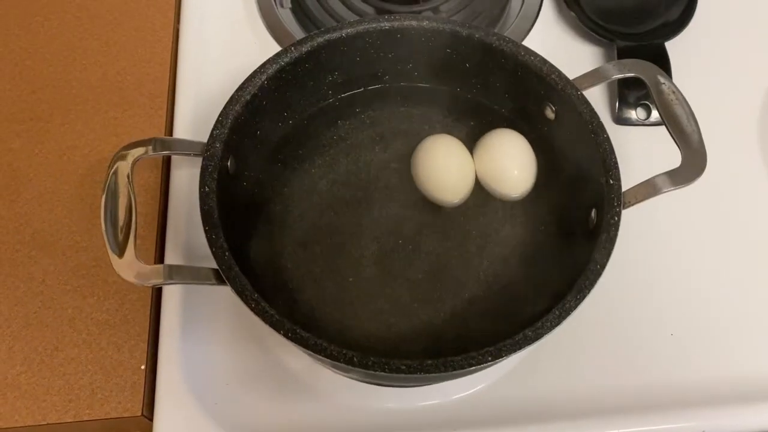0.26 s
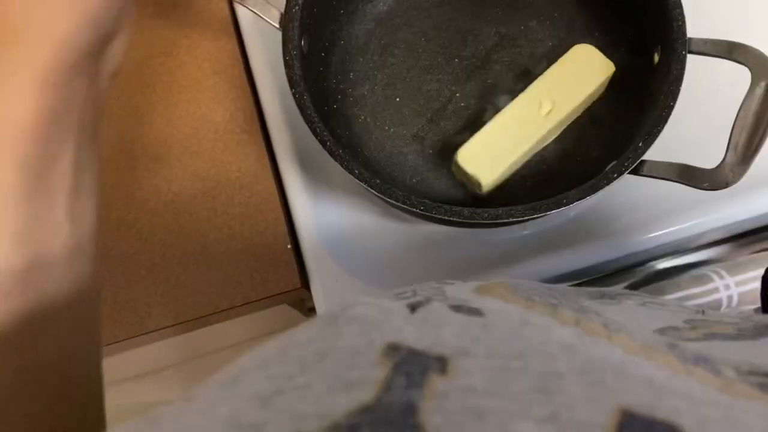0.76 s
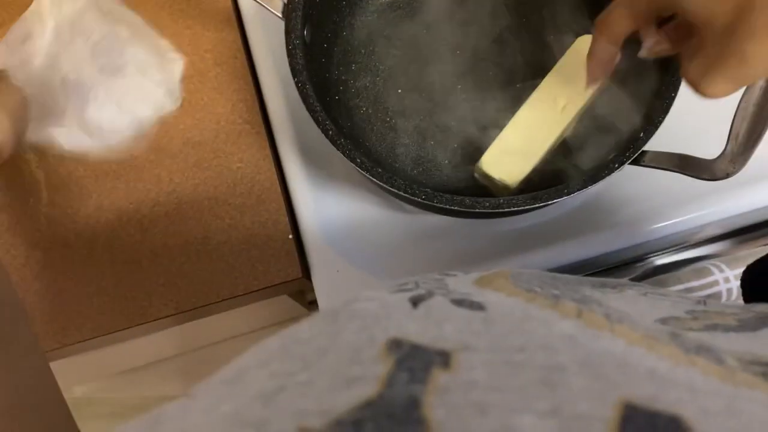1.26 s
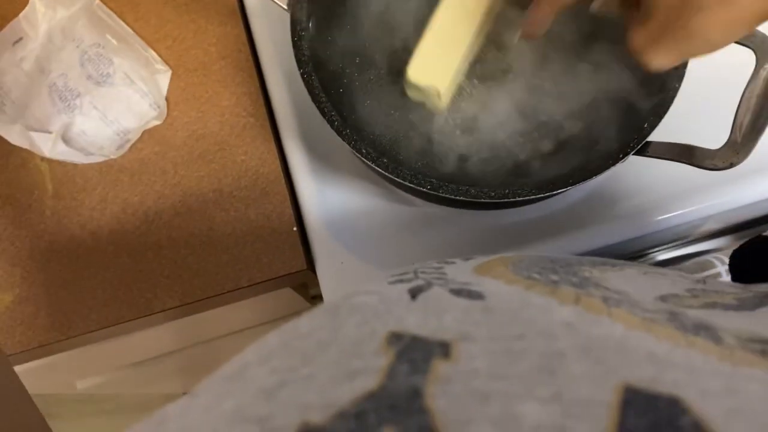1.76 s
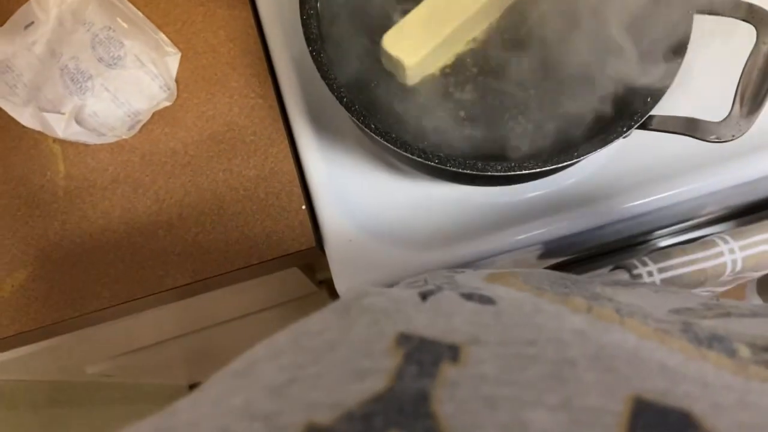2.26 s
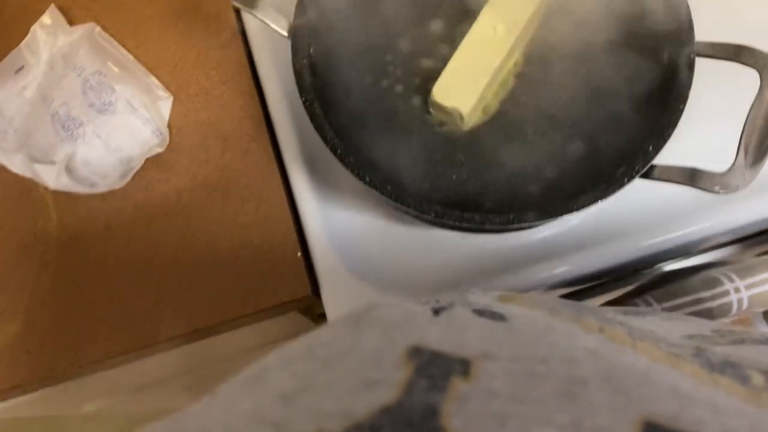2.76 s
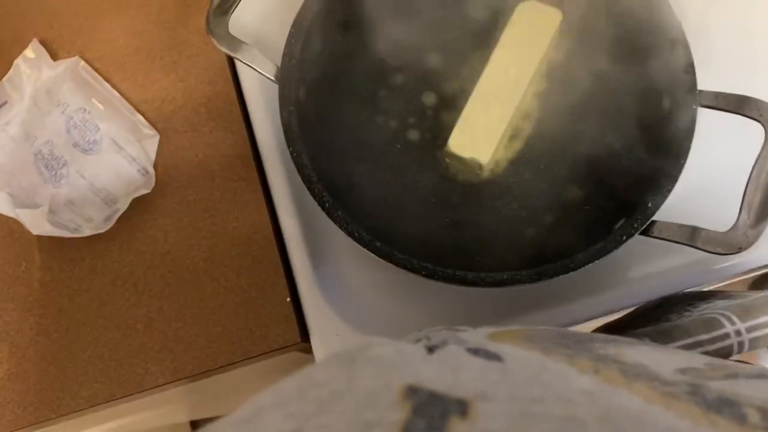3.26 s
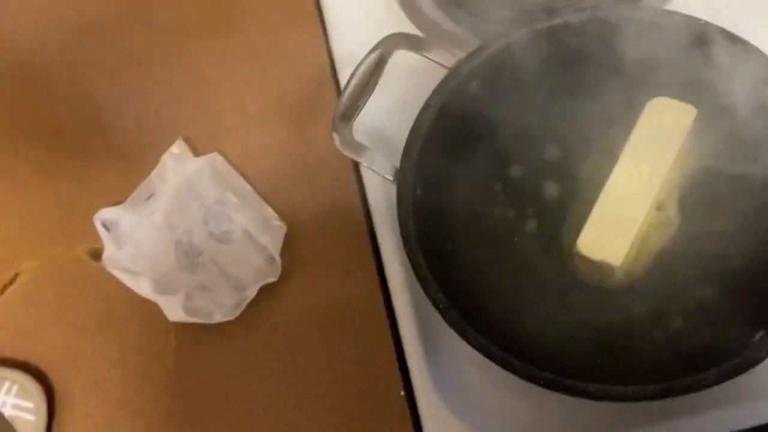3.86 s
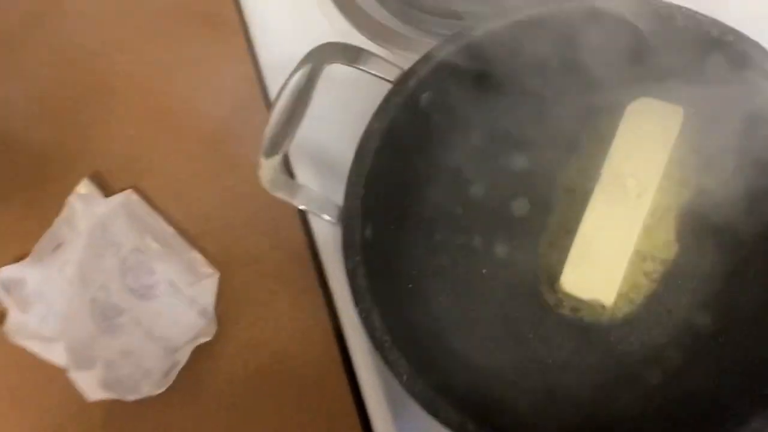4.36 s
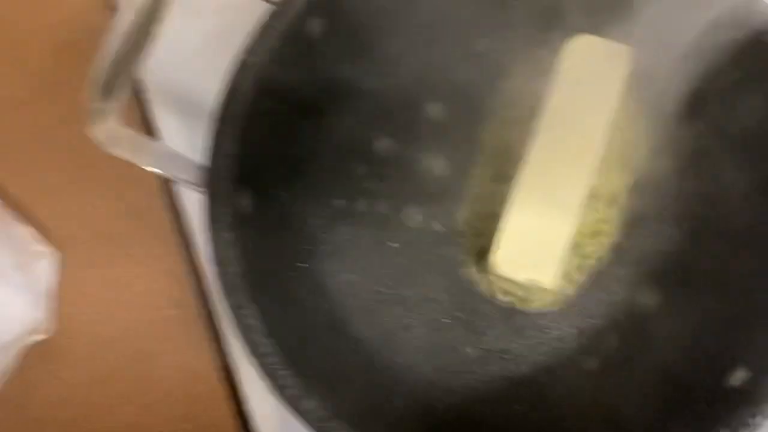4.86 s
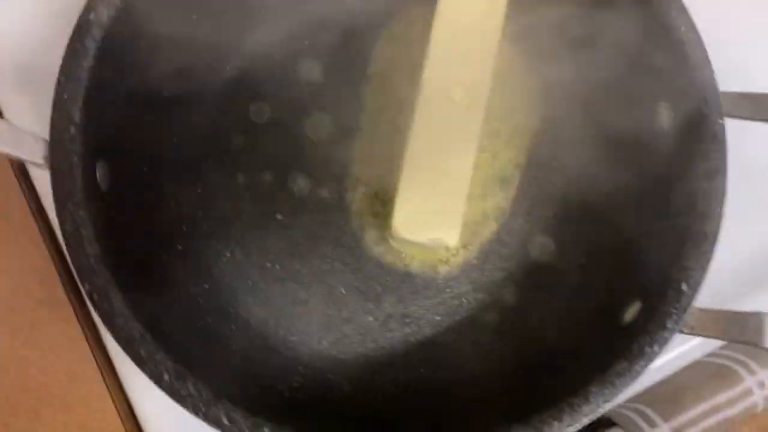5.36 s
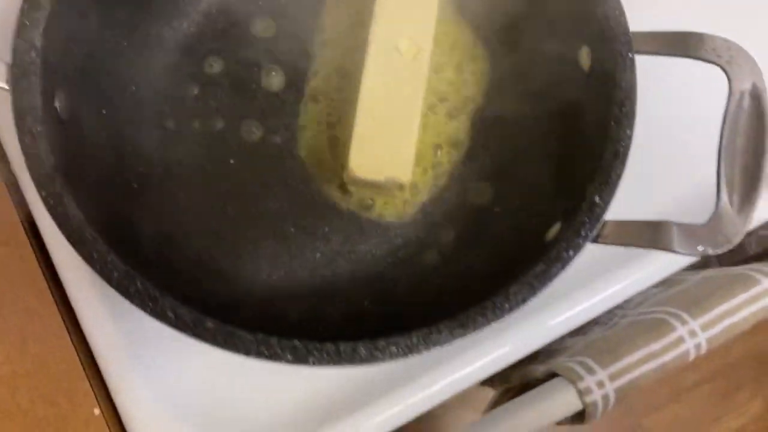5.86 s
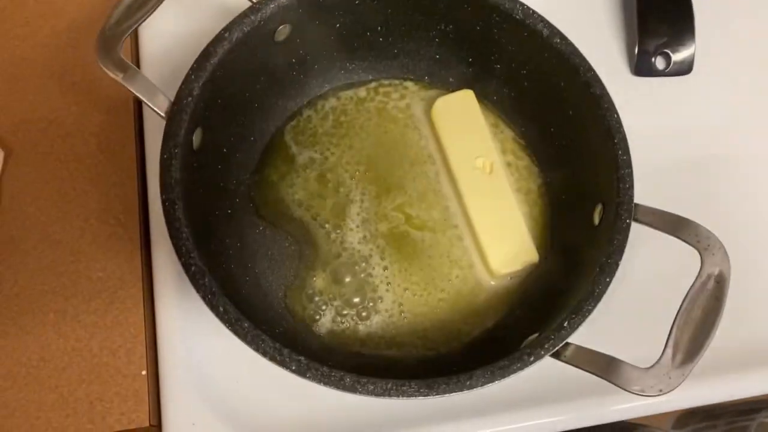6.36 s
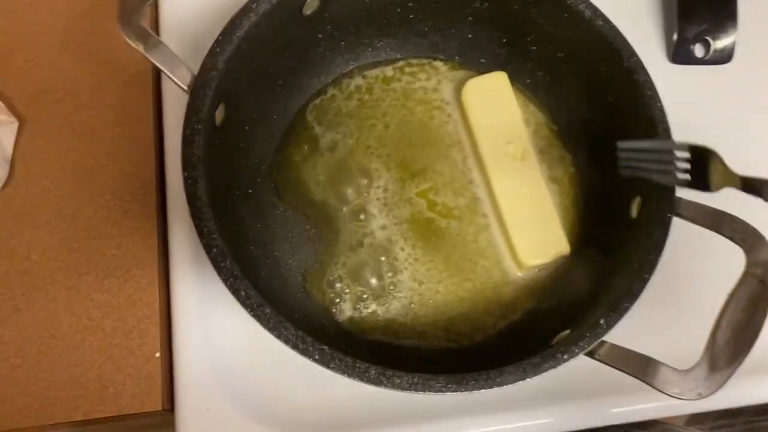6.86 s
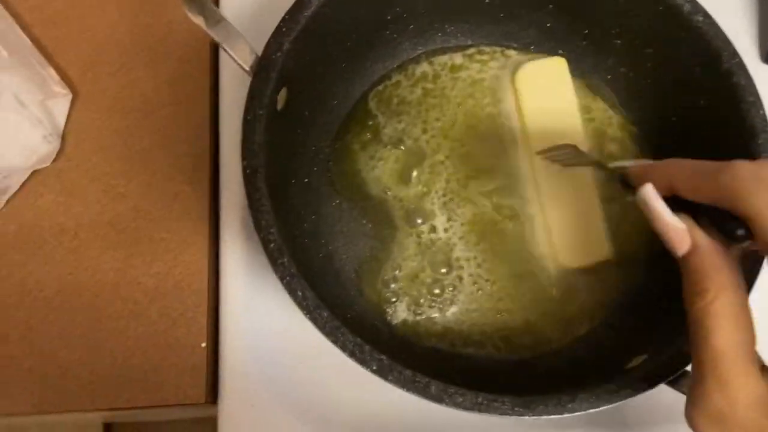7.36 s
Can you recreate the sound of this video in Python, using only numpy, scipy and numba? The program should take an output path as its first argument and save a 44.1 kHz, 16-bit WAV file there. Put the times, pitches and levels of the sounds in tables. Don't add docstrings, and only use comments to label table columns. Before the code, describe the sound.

Under a humming kitchen extractor, a quiet simmer cuts abruptly to loud searing butter, then to gentler bubbling with small spitting clicks.

```python
import sys
import numpy as np
from scipy import signal
from scipy.fft import rfft, irfft, next_fast_len
from scipy.io import wavfile
from scipy.ndimage import uniform_filter1d
from numba import njit

SR = 44100
rng = np.random.default_rng(int(sys.argv[2]) if len(sys.argv) > 2 else 0)


def master_out(mix):
    frames = np.transpose(np.atleast_2d(mix))
    ceiling = np.clip(frames, -1, 1)
    pcm = np.round(ceiling * 32767).astype(np.int16)
    wavfile.write(sys.argv[1], SR, pcm)


def convert_level_to_amplitude(level_db):
    exponent = np.asarray(level_db, float) / 20
    return 10 ** exponent


N = 335160


def curves(rows, t):
    s, *columns = np.transpose(rows)
    return [np.interp(t, s, column) for column in columns]


def colour(points, hz, column=1):
    points = np.array(points, float)
    octave = np.log2(np.maximum(hz, 1))
    point_octave = np.log2(points[:, 0])
    below = np.maximum(point_octave[0] - octave, 0)
    above = np.maximum(octave - point_octave[-1], 0)
    return np.interp(octave, point_octave, points[:, column]) - 18 * (below + above)


def unit(x):
    return x / np.sqrt(np.mean(x ** 2))


def ring(x, hz, width):
    return signal.lfilter(*signal.iirpeak(hz, hz / width, SR), x)


def patches(shape, slow, wide):
    field = uniform_filter1d(rng.standard_normal(shape), int(wide), axis=0)
    field = uniform_filter1d(field, int(slow), axis=1)
    return unit(uniform_filter1d(field, int(slow), axis=1))


# frequency in Hz, level in dB.
SIMMER_COLOUR = [(1500, 0.0), (2000, -4), (2500, -12), (3000, -9), (3700, -11), (4500, -14.5), (5500, -11),
                 (7000, -7.5), (8500, -16), (10000, -21), (12000, -21), (14000, -26.0), (15600, -27.2)]
SEAR_COLOUR = [(1500, -18.5), (2000, -15.5), (2500, -10), (3000, -3), (3700, -2), (4500, -3.5), (5500, -1),
               (7000, -2.2), (8500, -2), (10000, 0.5), (12000, 1), (14000, -0.5), (15600, -1.5)]
FOAM_COLOUR = [(1500, -5.5), (2000, -18), (2500, 1), (3000, -2.5), (3700, -5), (4500, -5.5), (5500, -0.5),
               (7000, 2), (8500, -2), (10000, -9), (12000, -9), (14600, -20), (15600, -23)]
# time in seconds, level in dB per Hz,
# melted pool from 0 to 1, lead of the left port in radians as the phone turns.
SIMMER_MOVES = [(0, -88, .75, .7), (.73, -90, .75, .7)]
SEAR_MOVES = [(.74, -74.5, 0.16, 1.2), (.9, -71, 0, 0.73), (1.45, -70.5, 0.55, .9), (1.8, -69, 0.3, 0.17),
              (2.2, -68.5, 0.09, .3), (2.8, -66.5, .25, .5), (3.3, -65.5, 0.44, 0.65),
              (3.68, -69, 0.81, 1.8), (4.14, -68.5, 0.68, 1.24), (4.5, -66.5, 0.69, 1.75),
              (4.9, -63.5, 0.64, 1.8), (5.15, -66, 1, 1.05), (5.45, -66.5, 0.81, 0.78),
              (5.9, -68.5, 0.96, 1.25)]
FOAM_MOVES = [(5.92, -78.5, 0.73, .75), (6.45, -80, 0.91, 0.67), (6.85, -79, 0.95, .55),
              (7.35, -78.5, 1, 0.61), (7.47, -81, .9, .5), (7.6, -83, 0.51, .5)]
# bubbles per second, size spread in dB,
# steam share from 0 to 1, patchiness in dB, spurts in dB.
BURSTS = [
    (3000, 2, 0.83, 1.8, 0.2),
    (11950, 2.5, 0.76, 0.8, .5),
    (6200, 3.5, 0.5, 1.4, 0.96),
]
# frequency in Hz, share of the lead of the pan.
REACH = [(1800, 0.43), (2400, 1.2), (3500, 0.81), (5000, 0.065), (6700, 0.24), (8000, -0.022), (11000, 0),
         (12900, 0.028), (14500, -.25), (15100, -0.62)]


def sizzle(t, spectrum, moves, rate, spread_db, steam, patchy_db, spurt_db):
    jet = rng.standard_normal(len(t))
    draws = rng.random((int(rate * len(t) / SR), 3))
    when, pitch, big = draws.T
    start = (when * len(t)).astype(np.int64)
    hz = 2400 + 14500 * pitch
    size = np.sqrt(hz) * convert_level_to_amplitude(-spread_db * np.log(big + 0.0037))
    bubbles = grains(start, hz, size, 3.5, len(t))
    steam = np.clip(steam, 0, 1)
    boil = np.sqrt(steam) * jet + np.sqrt((1 - steam) * 0.69) * unit(bubbles)

    def db(hz, t):
        level, pool = curves(moves, t)[:2]
        spray = flares(t)
        pool_tilt_db, usual_pool = (11, 2, -4.5), 0.7
        flare_share = np.array((0.093, 0.1, 0.9))
        bands = np.outer(pool_tilt_db, pool - usual_pool) + np.outer(flare_share - 1, spray)
        centres = np.log([1700, 3500, 6200, 10500, 14300])
        tilt = np.array([np.interp(np.log(hz + 1), centres, band) for band in np.eye(5)[[1, 2, 4]]])
        flicker = patchy_db * patches((len(hz), len(t)), 6.5, 10)
        spurts = spurt_db * patches((1, len(t)), 5, 1)
        return colour(spectrum, hz)[:, None] + level + spray + tilt.T @ bands + flicker + spurts

    def lead(hz, t):
        return np.outer(np.interp(hz, *np.transpose(REACH)), curves(moves, t)[2])

    return ports(boil * np.sqrt(SR / 2), t[0], db, lead)


@njit
def grains(start, hz, size, cycles, length):
    out = np.zeros(length + 400)
    for k in range(len(hz)):
        step = np.exp((2j * np.pi - 3 / cycles) * hz[k] / SR)
        z = size[k] + 0j
        for i in range(min(int(2 * cycles * SR / hz[k]), 400)):
            out[start[k] + i] += z.imag
            z *= step
    return out[:length]


# peak time in seconds, lift in dB.
FLARES = [(1.63, 4.5), (2.0, 2.5), (2.25, 3), (2.63, 0), (3.89, 2.5), (4.27, 1.5), (4.68, 0), (5.29, 0.5),
          (6.05, 1), (6.31, 0.5), (7.0, 1.5)]


def flares(t):
    rise_s, fall_s = 0.09, 0.11
    return sum(db * np.exp(-((t - s) / np.where(t < s, rise_s, fall_s)) ** 2) for s, db in FLARES)


# frequency in Hz, lead of the left port in radians.
PORTS = [(5000, 0.2), (6850, 2.61), (7950, 3.61), (9600, 5.95), (11350, 7.04), (12900, 9.1), (14600, 10.33),
         (16000, 16.5)]
# frequency in Hz, wander in radians.
SCATTER = [(1500, 0.76), (2000, .15), (2600, 0.28), (4200, 0.97), (5200, 0.56), (6200, 0.4), (6850, 0.08),
           (7950, 0.053), (8800, 0.66), (9600, .04), (11350, .04), (12200, 0.64), (12900, .04),
           (14600, .04), (15200, 0.83)]


def ports(x, start, db=lambda hz, t: 0, lead=lambda hz, t: 0):
    hz, t, z = signal.stft(x, SR, nperseg=256)
    wander = np.interp(hz, *np.transpose(SCATTER))[:, None] * patches(z.shape, 2, 2)
    sway = 0.16 * patches(z.shape, 8, 6)
    own_lead = np.interp(hz, *np.transpose([(0, 0)] + PORTS))[:, None]
    turn = np.exp(.5j * (own_lead + lead(hz, t + start) + wander + sway))
    z = z * convert_level_to_amplitude(db(hz, t + start))
    return signal.istft(np.array([z * turn, z / turn]), SR, nperseg=256)[1][:, :len(x)]


# time in seconds, peak in dB, frequency in Hz.
SPITS = [(5.9843, -32, 5460), (6.0496, -37, 5200), (6.1662, -24, 5300), (6.2182, -32, 4730),
         (6.292, -26, 5710), (6.342, -26, 5630), (6.4307, -33, 5100), (6.515, -32, 3700),
         (6.6507, -34, 3080), (6.6906, -32, 5330), (6.738, -33, 5870), (6.8413, -36, 5700),
         (6.859, -25, 5690), (6.9111, -26, 4900), (6.961, -24.5, 5400), (7.0104, -26, 5120),
         (7.0578, -35, 5340), (7.0768, -30, 5470), (7.152, -24, 5160), (7.186, -26, 3040),
         (7.2429, -29, 5060), (7.3646, -28, 5180)]


def spits(t):
    out = np.zeros(len(t))
    for s, db, hz in SPITS:
        add_pop(out, s - t[0] - .0005, db - 2.5, 1.9 * hz, hz, .0009)
    return ports(out, t[0])


# time in seconds, peak in dB, start in Hz, end in Hz, length in seconds.
POPS = [(5.7567, -19.5, 3650, 605, 0.0063), (1.4, -35, 3100, 1940, 0.003), (1.267, -37, 2600, 2200, .006),
        (3.2, -34, 1050, 480, 0.0092), (4.8, -38, 630, 610, 0.014), (3.53, -38, 63, 70, .07),
        (1.2, -47, 60, 50, .09), (5.855, -36, 610, 540, 0.0063), (6.1, -38, 2500, 1700, 0.0055),
        (6.22, -38, 2500, 2350, 0.0042), (7.523, -38, 2400, 2250, 0.0043), (7.577, -38, 2700, 2600, 0.0031),
        (0.289, -47, 1300, 750, .004), (0.55, -42, 620, 520, 0.01)]
TAPS = [
    (1.2175, -30, 3600, 2300, .002),
    (1.2178, -29, 2200, 1300, .0024),
    (1.2605, -34, 3600, 1900, .002),
]


def knocks():
    out = np.zeros(N)
    for row in POPS + TAPS:
        add_pop(out, *row)
    return out


def add_pop(out, s, db, start_hz, end_hz, length):
    u = np.arange(int(length * SR)) / (length * SR)
    hz = end_hz + (start_hz - end_hz) * np.exp(-u / 0.085)
    swell = np.sin(np.pi * u ** 0.71) ** 0.2
    i = int(s * SR)
    out[i:i + len(u)] += convert_level_to_amplitude(db) * swell * np.sin(2 * np.pi * np.cumsum(hz) / SR)


# time in seconds, peak in dB.
TICKS = [(0.0233, -54.5), (0.1111, -58), (0.1645, -58), (0.2249, -53.5), (0.2844, -59), (0.3444, -55),
         (0.3965, -56), (0.4444, -67), (0.5013, -53.5), (0.5844, -64), (0.6544, -51)]
# frequency in Hz, width in Hz, level in dB.
POT = [(5700, 250, -1), (8150, 300, 3), (10600, 2500, -1.5), (13500, 3000, -6), (4300, 280, -0.5)]


def ticks(t):
    shake = sum(convert_level_to_amplitude(db) * (t > s) * np.exp(-((t - s) / 0.017) ** 2) for s, db in TICKS)
    buzz = sum(convert_level_to_amplitude(db) * unit(ring(rng.standard_normal(len(t)), hz, width)) for hz, width, db in POT)
    return ports(convert_level_to_amplitude(-8.5) * shake * buzz, t[0])


# time in seconds, level in dB.
DRUM = [(.73, -43), (1.4, -42), (1.7, -40), (2.6, -43), (3.55, -41), (3.9, -43.5), (4.7, -45), (5.4, -58),
        (5.9, -52)]
# frequency in Hz, width in Hz, level in dB.
PAN = [(433, 177, -1.5), (534, 117, -3), (618, 130, 1), (799, 102, -4.5), (1001, 260, 0.5), (1239, 97, 2),
       (1340, 600, -0.5)]


def drum(t):
    db, = curves(DRUM, t)
    dry_db, wet_db, pool_spreads_s, pool_takes_s = -3, -10, 3.8, 0.28
    wet = (1 + np.tanh((t - pool_spreads_s) / pool_takes_s)) / 2
    upper_db = dry_db + (wet_db - dry_db) * wet
    push = rng.standard_normal(len(t)) * convert_level_to_amplitude(1.3 * patches((1, len(t)), 910, 1)[0])
    modes = []
    for k, (hz, width, mode_db) in enumerate(PAN):
        tone = ring(ring(push, hz, width), hz, 1.23 * width)
        modes.append((-1) ** k * convert_level_to_amplitude(mode_db) * unit(tone))
    floor = sum(modes[:4]) + convert_level_to_amplitude(upper_db) * sum(modes[4:])
    return convert_level_to_amplitude(db - 5 + np.array([[-.7], [.7]])) * floor


# time in seconds, level in dB.
HUM = [
    [(.76, -32.2), (2.77, -32.9), (3.4, -32), (4.85, -30), (5.89, -31.5)],
    [(5.94, -33), (7.5, -31.5), (7.6, -31.5)],
]
# frequency in Hz, level in dB under the hum, start in radians.
MAINS = [(60, -25, .3), (180, -23, 0.52), (360, -24, 1.2)]


def hum(t, rows, hz, octave_db):
    db, = curves(rows, t)
    turn = 2 * np.pi * t
    buzz = np.sin(hz * turn) + convert_level_to_amplitude(octave_db) * np.cos(2 * hz * turn + 0.49)
    buzz = buzz + sum(convert_level_to_amplitude(d) * np.sin(f * turn + start) for f, d, start in MAINS)
    return np.sqrt(2) * convert_level_to_amplitude(db + np.array([[-.6], [.6]])) * buzz


# frequency in Hz, mid in dB per Hz, side in dB per Hz.
AIR_POT = [(30, -80, -110), (60, -81, -102), (90, -71, -99), (200, -74.5, -93), (332, -76.5, -87),
           (480, -75, -82), (596, -75.5, -70), (750, -82.5, -76), (900, -84, -75), (1120, -87, -82),
           (1330, -85, -88), (1600, -91.5, -94), (2000, -93, -96), (2530, -95, -91)]
AIR_PAN = [(30, -80, -96), (60.4, -76, -90), (91, -70, -86), (206, -69, -78), (330, -75, -83),
           (480, -74, -79), (600, -74.5, -76.5), (760, -76.5, -79.5), (904, -84.5, -77.5),
           (1140, -83.5, -83.5), (1360, -81, -85), (1580, -87, -92), (2020, -84.5, -98.5),
           (2400, -82.5, -85)]
# frequency in Hz, width in Hz, level in dB.
BLADES = [
    [(145.9, 1, 2), (292.4, 3.4, -2), (441.3, 4.4, -14), (524.5, 5, -13)],
    [(142.3, 2, -10.5), (287.6, 2.8, -5), (432, 4.2, -12), (156.2, 2.2, -1.5)],
]
# time in seconds, frequency in Hz, level in dB.
WHINE = [(0, 434, -63), (3.3, 429.6, -67), (3.7, 430.3, -55), (5.2, 433, -48), (5.8, 430, -47),
         (5.9, 436, -51), (5.95, 438.2, -52.5), (7.6, 440.5, -48.5)]


def hood(t, air, air_db, *wheel_db):
    n = next_fast_len(len(t), True)
    hz = np.fft.rfftfreq(n, 1 / SR)
    common, other = rfft(rng.standard_normal((2, n))) * np.sqrt(SR / 2)
    lean = np.clip(np.interp(hz, [100, 450, 900, 1400], [0.57, 0.49, 0.16, 0.32]), 0, 1)
    mid = common * convert_level_to_amplitude(colour(air, hz))
    loose = np.sqrt(1 - lean ** 2) * (.8j * common + .6 * other)
    side = (loose - lean * common) * convert_level_to_amplitude(colour(air, hz, column=2))
    rush = irfft(np.array([mid + side, mid - side]), n)[:, :len(t)]

    whine_hz, whine_db = curves(WHINE, t)
    tones = convert_level_to_amplitude(whine_db + 3) * np.sin(2 * np.pi * np.cumsum(whine_hz) / SR)
    for wheel, level_db in zip(BLADES, wheel_db):
        for f, width, db in wheel:
            skirt = unit(ring(rng.standard_normal(len(t)), f, width))
            tones = tones + convert_level_to_amplitude(level_db + db) * (np.sin(2 * np.pi * f * t) + 0.31 * skirt)
    return convert_level_to_amplitude(air_db) * rush + convert_level_to_amplitude(np.array([[-.8], [.8]])) * tones


# start in seconds, end in seconds, fade-in in seconds, hood air in dB,
# fast fan wheel in dB, slow fan wheel in dB.
SHOTS = [
    (0, .727, 0.00094, 0.5, -45.5, -65),
    (.727, 5.905, 0.021, -0.5, -44.5, -44),
    (5.905, 7.6, 0.025, 1, -45, -47.5),
]


def scene():
    def sear_extra(t):
        return hum(t, HUM[0], hz=120.0, octave_db=-11.5) + drum(t)

    def foam_extra(t):
        return hum(t, HUM[1], hz=120.35, octave_db=-6.7) + spits(t)

    airs = (AIR_POT, AIR_PAN, AIR_PAN)
    colours = (SIMMER_COLOUR, SEAR_COLOUR, FOAM_COLOUR)
    moves = (SIMMER_MOVES, SEAR_MOVES, FOAM_MOVES)
    extras = (ticks, sear_extra, foam_extra)
    time = np.arange(N) / SR
    out = np.tile(knocks(), (2, 1))
    for row, air, spectrum, move, burst, extra in zip(SHOTS, airs, colours, moves, BURSTS, extras):
        t0, t1, fade, *hood_db = row
        shot = slice(int(t0 * SR), min(int(t1 * SR), N))
        t = time[shot]
        sound = hood(t, air, *hood_db) + extra(t) + sizzle(t, spectrum, move, *burst)
        out[:, shot] += np.clip((t - t0) / fade, 0, 1) * sound
    return out


def band_limit(x):
    return signal.sosfilt(signal.butter(12, 17070, fs=SR, output="sos"), x)


def record(dry):
    low_pass = signal.ellip(10, .3, 70, 15850, fs=SR, output="sos")
    mix = signal.sosfilt(low_pass, dry)
    return band_limit(mix)


dry = scene()
out = record(dry)
master_out(out)
```